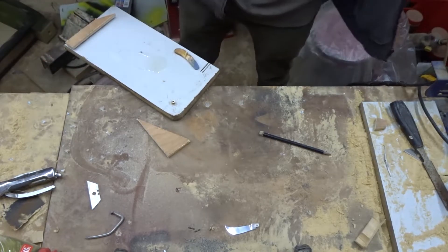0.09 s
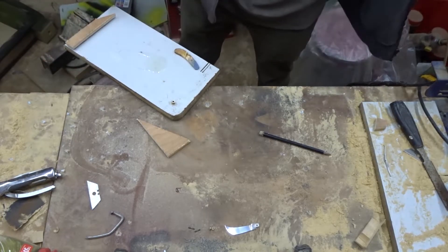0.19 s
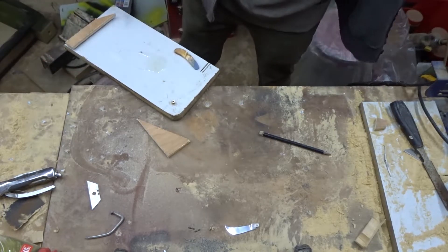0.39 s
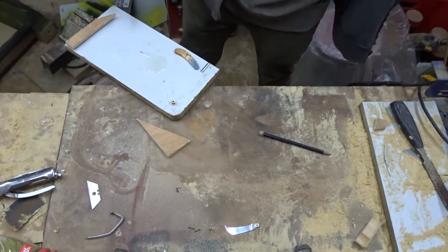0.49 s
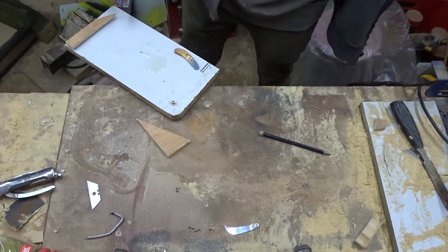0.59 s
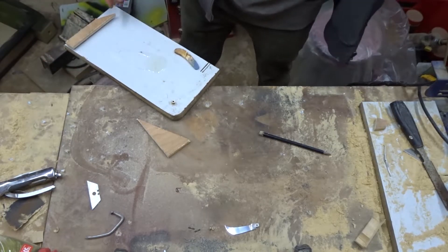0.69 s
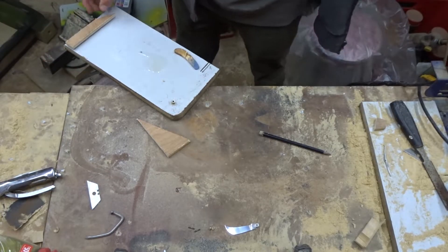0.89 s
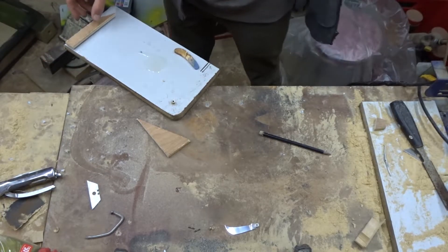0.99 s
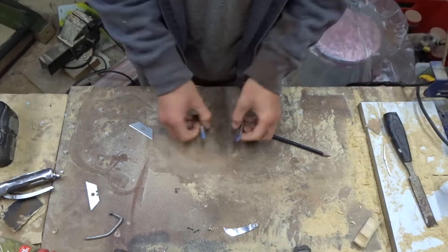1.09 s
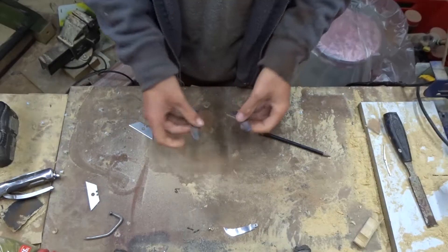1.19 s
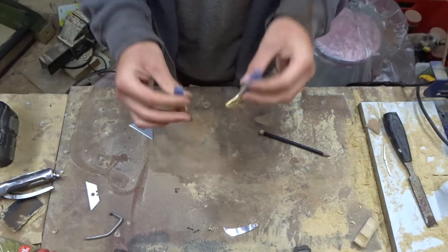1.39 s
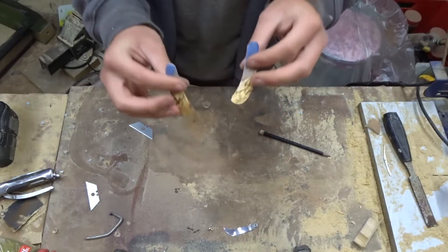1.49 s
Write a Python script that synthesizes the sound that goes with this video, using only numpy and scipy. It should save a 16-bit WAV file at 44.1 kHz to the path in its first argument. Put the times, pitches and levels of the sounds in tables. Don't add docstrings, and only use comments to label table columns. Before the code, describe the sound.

A spring clamp clatters onto a wooden workbench from 0.2 to 0.4 s, a dense rattle of hard knocks. Faint bumps follow around 0.5 s; wood scuffs softly and drops with dull, quieter taps at 0.65-0.75 s. A second clamp snaps at 0.82 s, bright and metallic, then small bumps. Short workshop echoes, close stereo pickup. At 1.13 s it cuts to faint air and low drone.

```python
import sys
import numpy as np
from scipy import signal
from scipy.fft import rfft, irfft
from scipy.io import wavfile
from scipy.ndimage import uniform_filter1d

SR = 44100
rng = np.random.default_rng(int(sys.argv[2]) if len(sys.argv) > 2 else 0)


def wrap_up_sound(samples):
    columns = np.atleast_2d(samples).T
    tamed = np.clip(columns, -1, 1)
    steps = np.round(tamed * 32767).astype(np.int16)
    wavfile.write(sys.argv[1], SR, steps)


def makeup_ratio(level_db):
    decades = np.asarray(level_db, float) / 20
    return 10 ** decades


N = 66150
T = np.arange(N) / SR
CHANGE_S = 1.135


def evened(x):
    return x / np.sqrt(np.mean(x ** 2) + 1e-20)


def read(points, hz):
    f, value = np.transpose(points)
    return np.interp(np.log(hz + 1), np.log(f + 1), value)


def curve(points):
    s, db = np.transpose(points)
    return makeup_ratio(np.interp(T, s, db, left=-120, right=-120))


def shaped(x, gain):
    spectrum = rfft(x, 2 * N) * gain(np.fft.rfftfreq(2 * N, 1 / SR))
    return irfft(spectrum, 2 * N)[..., :N]


# f/Hz, level/dB
AIR = [(20, 4), (100, 0), (200, 0), (420, -2), (1000, -6), (2000, -8), (4000, -12), (10900, -20)]
# f/Hz, correlation/1
AIR_SAME = [(60, .99), (300, .9), (1000, .6), (4000, .1), (11000, .1)]
AIR_DB = -64
FADING_DB, FADING_S = 3, .06
LATE_DB, LATE_HUM_DB = 1, -66


def air():
    a, b, c = rng.standard_normal((3, N))
    same = lambda hz: np.clip(read(AIR_SAME, hz), -1, 1)
    other = shaped(a, same) + shaped(b, lambda hz: np.sqrt(1 - same(hz) ** 2))
    tone = evened(shaped(np.array([a, other]), lambda hz: makeup_ratio(read(AIR, hz))))
    late = T > CHANGE_S
    level_db = AIR_DB + FADING_DB * np.exp(-T / FADING_S) + LATE_DB * late
    drone = evened(shaped(c, lambda hz: hz / (8 + hz) / (1 + (hz / 40) ** 2)))
    return makeup_ratio(level_db) * tone + late * makeup_ratio(LATE_HUM_DB) * drone


# f/Hz, t60/s
SHOP = [(100, .5), (400, .3), (1300, .2), (2500, .2), (4000, .18), (6000, .16), (10000, .15)]
# f/Hz, level/dB
WET = [(100, -4), (350, 0.5), (800, 0.5), (2500, 3), (4000, 7.5), (9000, 12)]
FAR_DB, FAR_LONGER = -22, 3.02


def shop(x):
    taps = np.zeros((2, SR // 2))
    at = np.arange(100, SR // 2 - 20, 20)
    at = at + rng.integers(0, 20, (2, len(at)))
    np.put_along_axis(taps, at, rng.choice([-1., 1.], at.shape), 1)
    hz, t, z = signal.stft(taps, SR, nperseg=512)
    apart = np.clip((hz / 1500) ** 1.5, .005, 1)[:, None]
    z = np.array([z[0], np.sqrt(1 - apart ** 2) * z[0] + apart * z[1]])
    fall_db = -60 * t / read(SHOP, hz)[:, None]
    fall = makeup_ratio(fall_db) + makeup_ratio(FAR_DB + fall_db / FAR_LONGER)
    tail = signal.istft(z * makeup_ratio(read(WET, hz)[:, None]) * fall, SR, nperseg=512)[1]
    return signal.fftconvolve(x[None], tail / 12, axes=1)[:, :N]


def ring(modes, longest=1, spread=0, count=1):
    t = T[:SR // 2, None]
    detune = 1 + spread * np.sin(np.e * np.arange(count))
    h = 0
    for hz, db, t60 in modes:
        t60 = np.clip(t60, .01, min(longest, 60 / hz + 0.041))
        h = h + makeup_ratio(db - 60 * t / t60) * np.sin(2 * np.pi * hz * t * detune)
    h = h.sum(1)
    return h / abs(h).max()


# f/Hz, level/dB, t60/s
BENCH = [(47, -4.5, .4), (80.5, -8.5, 0.25), (104.3, -4.5, 0.61), (124.7, -2, 0.082), (174.7, -4.5, 0.049),
         (253, -7, .08), (315.3, -6, 0.15), (357.2, 0.5, .25), (422.7, 6.5, 0.053), (496, -0.5, 0.054),
         (572.4, 0.5, 0.066), (648.5, -6.5, 0.064), (708.6, -5, 0.082), (785, -0.5, 0.079)]
# t/s, level/dB
BUMPS = [
    (0.493, -36.5),
    (0.567, -40.5),
    (0.904, -31),
    (0.951, -37),
    (1.035, -37.5),
    (1.059, -43),
    (1.071, -41),
    (1.11, -43.5),
]
# t/s, level/dB
RUMBLE = [(.32, -30.5), (.39, -40.5), (.446, -44.5), (.52, -44), (.6, -56), (.64, -49), (.664, -41.5),
          (.726, -38), (.752, -37), (.792, -55), (.82, -48), (.84, -32.5), (.9, -41.5), (.94, -52.5),
          (1.02, -53), (1.04, -46.5), (1.13, -59.5)]
RUMBLE_DB = -1


def bench_top(blows):
    soft = sum(makeup_ratio(db) * np.exp(-((T - s) / 0.00045) ** 2) / 20 for s, db in BUMPS)
    knocks = signal.fftconvolve(blows + soft, ring(BENCH))[:N]
    lumps = makeup_ratio(1.5 * evened(uniform_filter1d(rng.standard_normal(N), size=900)))
    tremble = signal.fftconvolve(lumps * rng.standard_normal(N), ring(BENCH, 0.4))[:N]
    tremble = shaped(tremble, lambda hz: 1 / (1 + (hz / 380) ** 4))
    swell = uniform_filter1d(curve(RUMBLE), size=900)
    return knocks + makeup_ratio(RUMBLE_DB) * swell * evened(tremble)


# t/s, level/dB
SLIDE = [
    (.55, -65.5),
    (.6, -56),
    (.66, -51.5),
    (.7, -64),
    (.77, -96),
]
# f/Hz, level/dB
GRIT = [(500, -1), (1000, 3.5), (1900, 8.5), (2600, 3.5), (3800, 3), (6000, -2.5), (11000, -11.5)]


def slide():
    grit = rng.standard_normal((2, N)) * makeup_ratio(0.83 * rng.exponential(1, N))
    scuff = shaped(grit + 0.035 * grit[::-1], lambda hz: makeup_ratio(read(GRIT, hz)))
    return curve(SLIDE) * evened(scuff)


def burst(start, db, length, top_hz):
    t = np.maximum(T - start, 0)
    x = (T >= start) * np.exp(-t / max(length, 3e-4)) * rng.standard_normal(N)
    r = np.exp(-2 * np.pi * top_hz / SR)
    return makeup_ratio(db) * signal.lfilter([1 - r], [1, -r], x / np.linalg.norm(x))


REBOUND_S, REBOUND_DB = 0.0015966, -7


def tap(start, db, top_hz):
    r = np.exp(-2 * np.pi * top_hz / SR)
    n = np.arange(N) - round(start * SR)
    push = (n == 0) + makeup_ratio(REBOUND_DB) * (n == round(REBOUND_S * SR))
    return makeup_ratio(db) * signal.lfilter([1 - r], [1, -r], push)


SPOT_DB, SPOT_WIDTH = 6.5, 0.33


def favour(x, spot_hz):
    r = np.exp(-np.pi * SPOT_WIDTH * spot_hz / SR)
    poles = [1, -2 * r * np.cos(2 * np.pi * spot_hz / SR), r * r]
    band = signal.lfilter([(1 - r * r) / 2, 0, (r * r - 1) / 2], poles, x)
    return x + makeup_ratio(SPOT_DB) * band


DULL_HZ, DULL_DB = 9000, 11
LONGEST_S, LOOSE = .06, .45
SPREAD = .045
CRACK_S = 0.0073
PAN_HZ, BLOW_LOW_HZ = 720, 110


def struck(blows, modes, colour, crack_db, tilt_db, pan_db, count):
    hardest_db = max(blow[1] for blow in blows)
    pushes, cracks, into_bench = 0, 0, 0
    for s, db, bench_db, spot_hz in blows:
        top_hz = DULL_HZ * 2 ** ((db - hardest_db) / DULL_DB)
        push = favour(tap(s, db, top_hz), spot_hz)
        pushes = pushes + push
        into_bench = into_bench + push * makeup_ratio(bench_db)
        cracks = cracks + favour(burst(s, db, CRACK_S, top_hz), spot_hz)
    longest = LONGEST_S * (LOOSE if count > 1 else 1)
    body = signal.fftconvolve(pushes, ring(modes, longest, SPREAD, count))[:N]
    tilt = lambda hz: tilt_db * np.log2((hz + 50) / 1000)
    crack = shaped(cracks, lambda hz: makeup_ratio(crack_db + read(colour, hz) + tilt(hz)))
    thin = lambda hz: (1j * hz / (260 + 1j * hz)) ** 2
    lean = lambda hz: hz ** 2 / (hz ** 2 + PAN_HZ ** 2)
    sides = [shaped(body + crack, lambda hz: makeup_ratio(p * lean(hz)) * thin(hz)) for p in (pan_db, -pan_db)]
    return np.array(sides), shaped(into_bench, lambda hz: 1j * hz / (BLOW_LOW_HZ + 1j * hz))


# t/s, level/dB, share into bench/dB, favoured f/Hz
DROP = [(.646, -55.5, 7, 350), (.653, -41.5, -2.5, 600), (.659, -36, 5, 1300), (.662, -33.5, 9, 280),
        (.667, -34.5, 7.5, 280), (.673, -41, 0, 900), (.679, -42.5, 13, 300), (.686, -46, 3, 590),
        (.692, -40, -2, 406), (.699, -44, 7.5, 407), (.706, -38, 8, 400), (.712, -43, 7, 800),
        (.721, -46, 8, 800), (.730, -48, -1, 900), (.738, -49.5, 20, 1000), (.745, -47, 3.5, 700),
        (.752, -47, 6, 600), (.77, -64, -11, 500)]
# f/Hz, level/dB, t60/s
WOOD = [(276, 16.5, 0.07), (306, 2, 0.078), (670, -9, 0.11), (1000, 0.5, 0.05), (1260, -1, 0.029),
        (1610, -3, 0.038), (1990, -6, 0.019), (2500, -7, 0.03), (3070, -50, 0.023)]
# f/Hz, level/dB
CRACK = [(60, -15.5), (300, 6.5), (1270, 10.5), (2500, 3.5), (4000, -6), (7000, -15), (11000, -27.5)]


def wood_drop():
    return struck(DROP, WOOD, CRACK, crack_db=20.5, tilt_db=1, pan_db=-3.0, count=3)


# t/s, level/dB, share into bench/dB, favoured f/Hz
SNAP = [
    (.815, -20, -2.5, 3000),
    (.819, -18.5, -5.5, 3300),
    (.823, -21.5, -7.5, 664),
    (.828, -19, 2, 2950),
    (.834, -30.5, -2.5, 745),
    (.841, -29.5, 10, 152),
    (.855, -37, -17, 3160),
    (.863, -38, 4, 290),
    (.872, -51, -18, 3300),
    (.882, -34.5, 3.5, 315),
]
# f/Hz, level/dB, t60/s
STEEL = [(660, 6, .06), (680, 22, .06), (890, 13, .04), (1454, 15, .03), (2210, 19, .05), (2500, 11, .05),
         (2770, 18.5, .06), (2806, 15, .06), (3240, 17.5, .06), (3400, 16, .06), (3780, 13, .05),
         (4130, 3, .05), (5120, 10, .05), (7900, -16, .03)]
# f/Hz, level/dB
STEEL_CRACK = [(60, 17), (750, 7), (1800, 0), (2700, -3), (3600, -1), (4700, -15), (7000, -21),
               (11000, -50)]


def clamp_snap():
    return struck(SNAP, STEEL, STEEL_CRACK, crack_db=16.5, tilt_db=1.5, pan_db=-3.0, count=5)


# t/s, level/dB, share into bench/dB, favoured f/Hz
CLATTER = [(.207, -18.5, -7.5, 3590), (.210, -15.5, 2, 2500), (.214, -22.5, -3, 1260),
           (.217, -18.5, -1, 430), (.2225, -19.5, -4, 2500), (.228, -14, 2.5, 2500),
           (.233, -19.5, -1.5, 2500), (.237, -20, -4.5, 1260), (.247, -20, 8, 1260),
           (.2505, -15.5, 3, 2500), (.255, -23.5, 8, 1260), (.260, -19, 4.5, 790), (.266, -23, 3, 790),
           (.271, -21, -3.5, 790), (.277, -22.5, -7.5, 790), (.285, -21, 3, 400), (.291, -17, -6.5, 4720),
           (.294, -14.5, -11, 2500), (.300, -21.5, 9, 300), (.306, -27, 6.5, 2500), (.312, -27, 12, 2500),
           (.325, -34.5, 13, 570), (.336, -36, 8, 570), (.348, -31, 1.5, 400), (.365, -37, 6.5, 400),
           (.380, -43.5, 18.5, 110), (.405, -37.5, 1.5, 350)]
# f/Hz, level/dB, t60/s
CLAMP = [(1236, -0.5, 0.026), (1273, -2, 0.033), (1350, -7, 0.099), (933, 1, 0.02), (1674, -2.5, 0.04),
         (1790, -13, .05), (2450, -6, .05), (2000, -10, 0.04), (2546, -11.5, 0.15), (2626, -5, 0.031),
         (3280, -16.5, 0.12), (3597, -8.5, .03), (4860, -22, .05), (6870, -34.5, .015)]


def clamp_clatter():
    return struck(CLATTER, CLAMP, CRACK, crack_db=10, tilt_db=3.0, pan_db=-3.5, count=1)


LEFT_LAG_S = 56e-6
LEVEL_DB = -1


def scene():
    clamp, clamp_blows = clamp_clatter()
    wood, wood_blows = wood_drop()
    steel, steel_blows = clamp_snap()
    bench = bench_top(clamp_blows + wood_blows + steel_blows)
    direct = clamp + wood + steel + bench + slide()
    wet = sum(shop(x) for x in (clamp.mean(0), wood.mean(0), steel.mean(0), bench))
    near = [shaped(side, lambda hz: np.exp(-1j * np.pi * sign * LEFT_LAG_S * hz))
            for side, sign in zip(direct, (1, -1))]
    present = np.clip((CHANGE_S - T) / .005, 0, 1)
    return makeup_ratio(LEVEL_DB) * (np.array(near) + wet) * present + air()


def band_limit(x):
    return signal.sosfilt(signal.butter(12, 11720, fs=SR, output="sos"), x)


def record(dry):
    low_hz, top_hz, ceiling = 43.5, 11050, .5
    x = shaped(dry, lambda hz: (1j * hz / (low_hz + 1j * hz)) ** 2)
    x = ceiling * np.tanh(x / ceiling)
    x = shaped(x, lambda hz: 1 / (1 + (hz / top_hz) ** 120))
    return band_limit(x)


dry = scene()
out = record(dry)
wrap_up_sound(out)
```